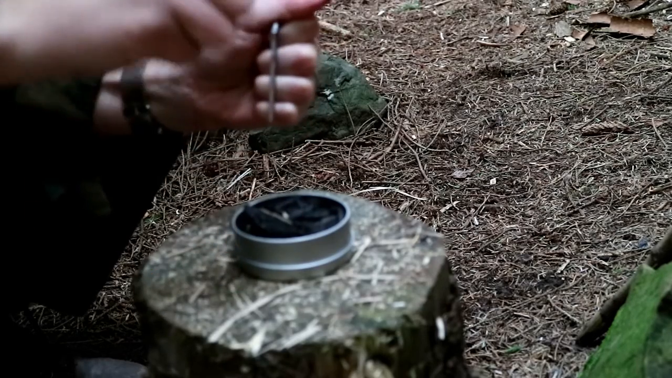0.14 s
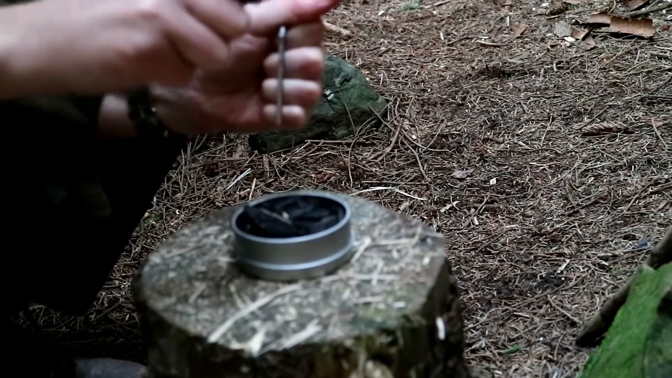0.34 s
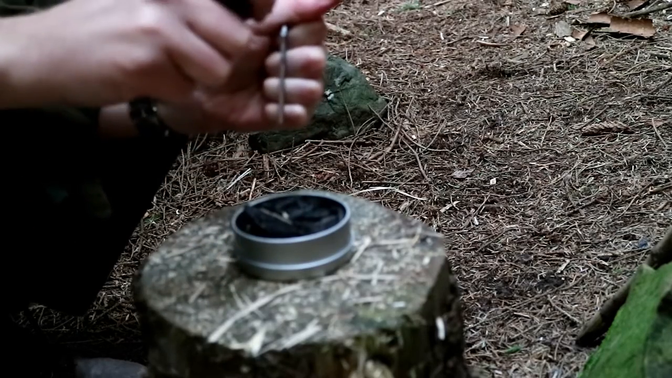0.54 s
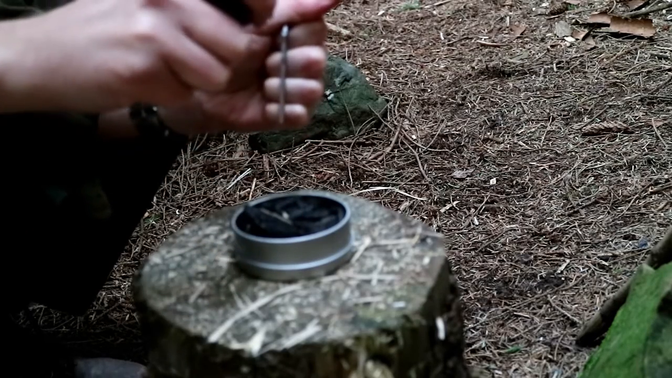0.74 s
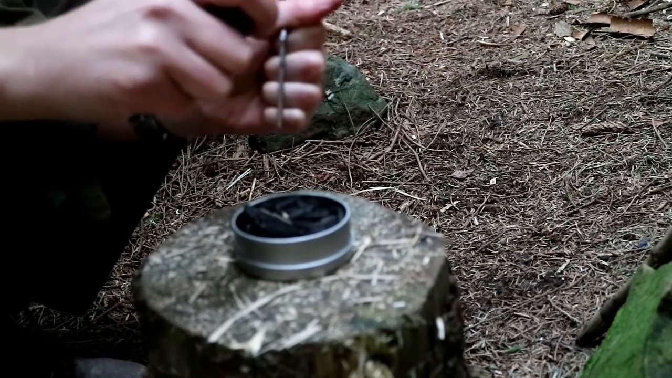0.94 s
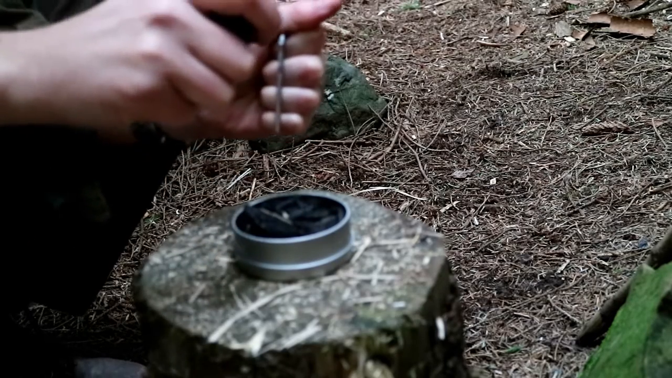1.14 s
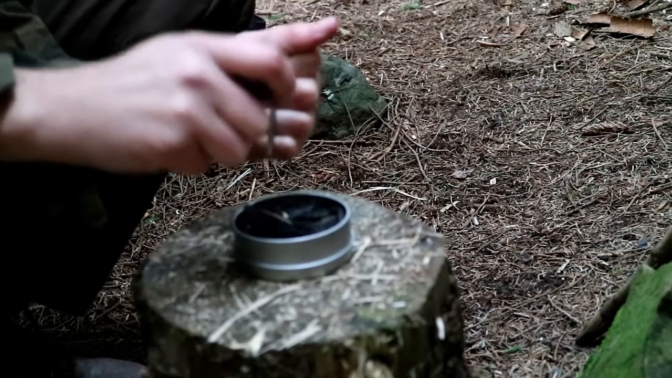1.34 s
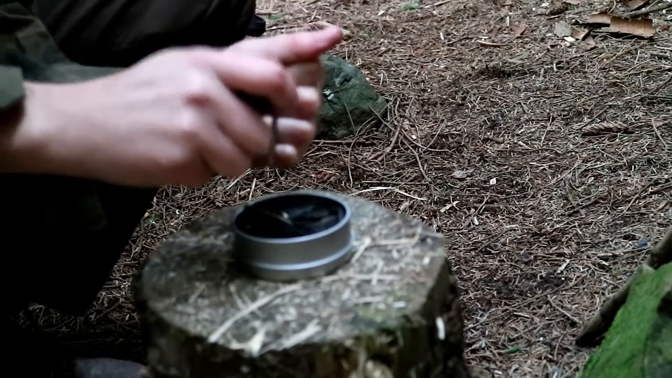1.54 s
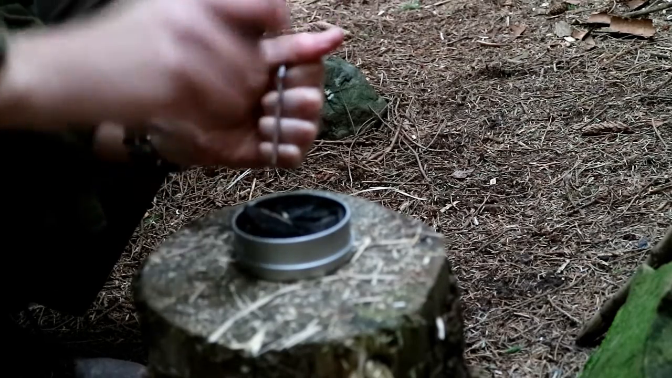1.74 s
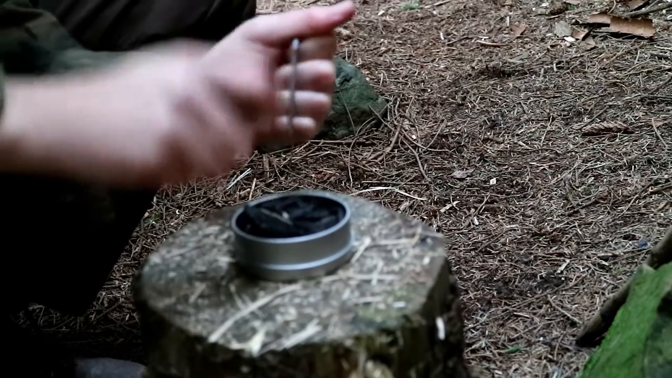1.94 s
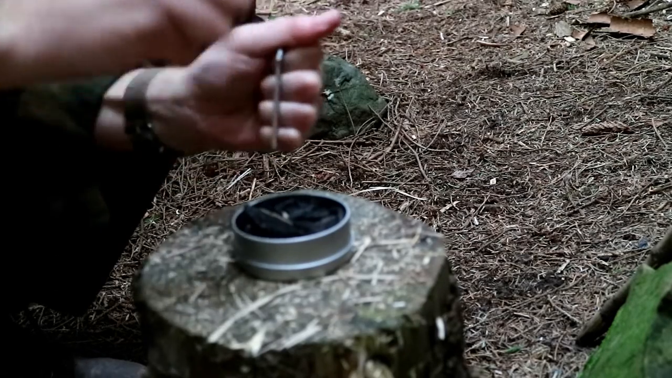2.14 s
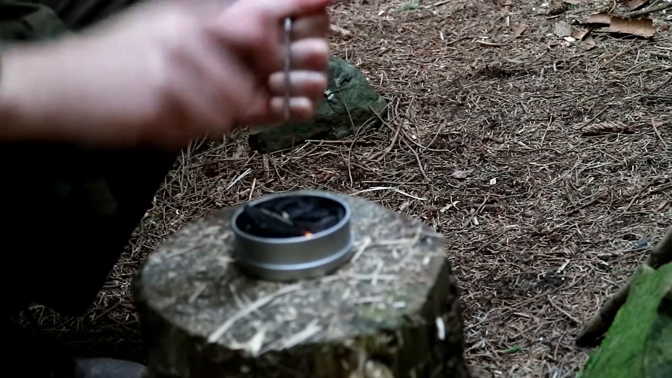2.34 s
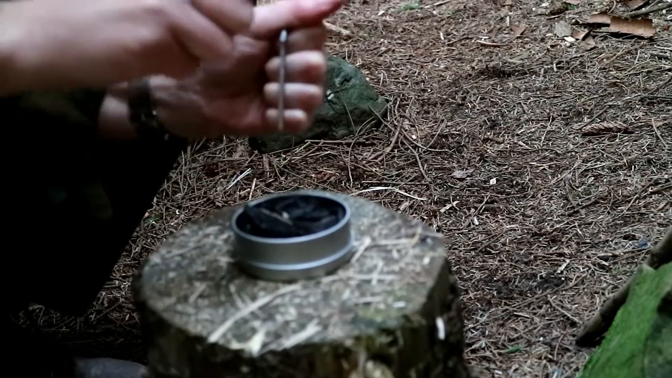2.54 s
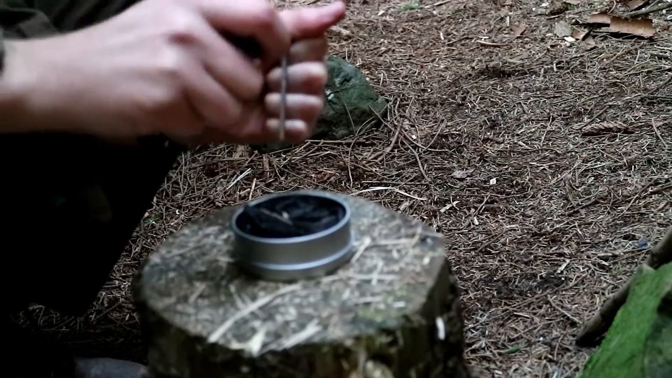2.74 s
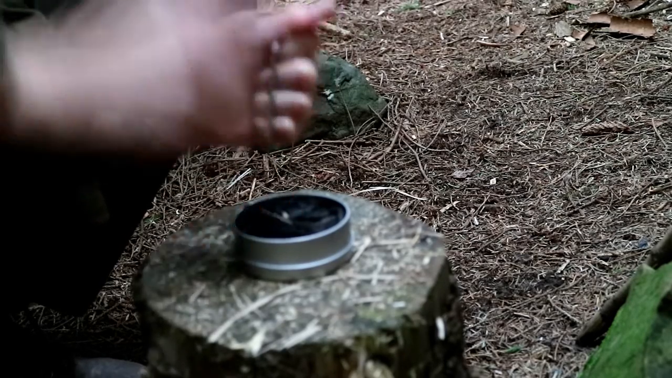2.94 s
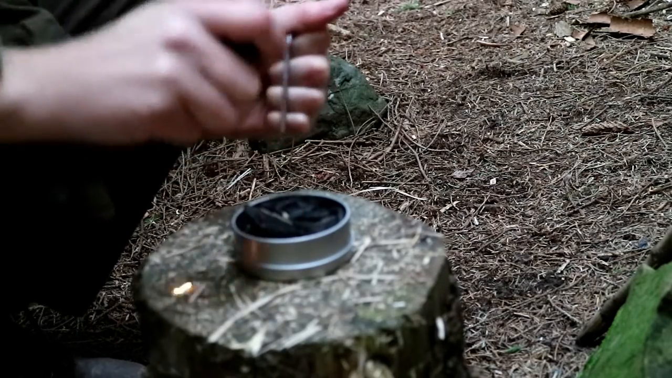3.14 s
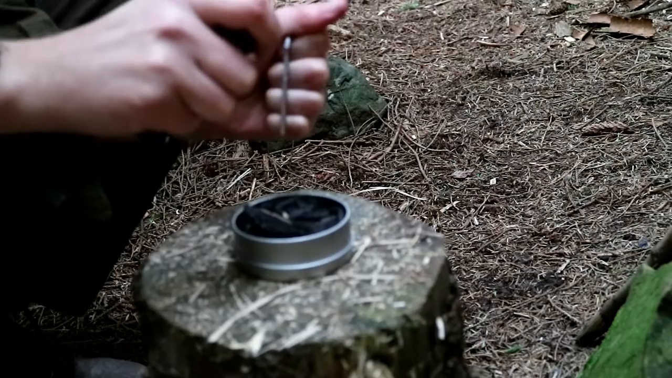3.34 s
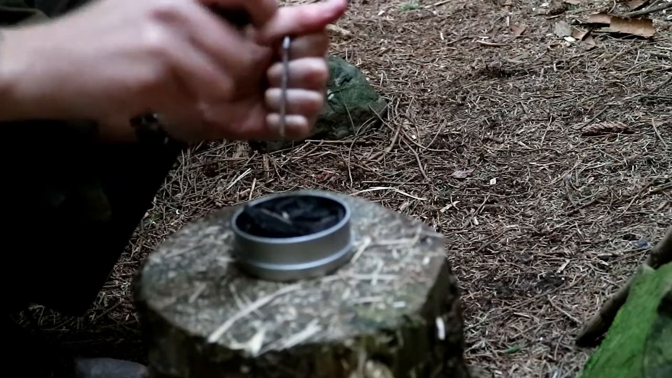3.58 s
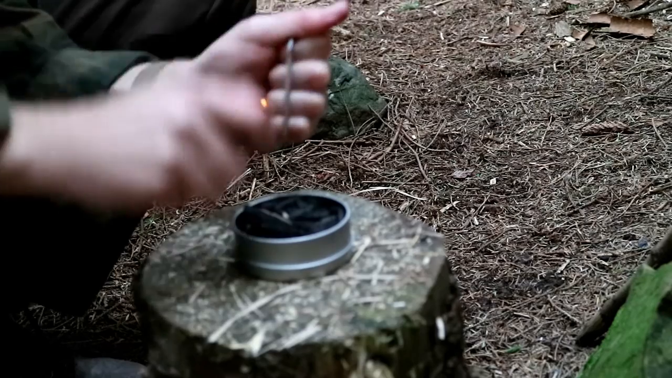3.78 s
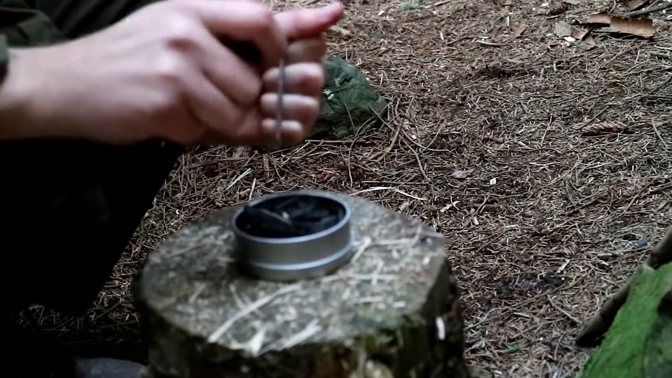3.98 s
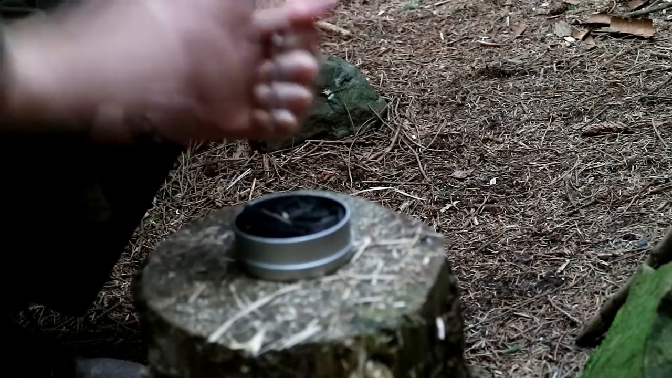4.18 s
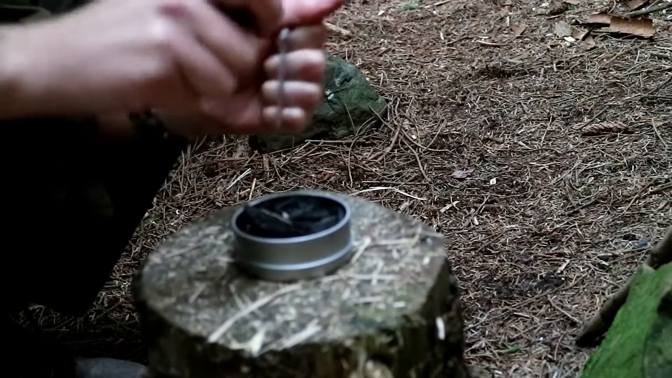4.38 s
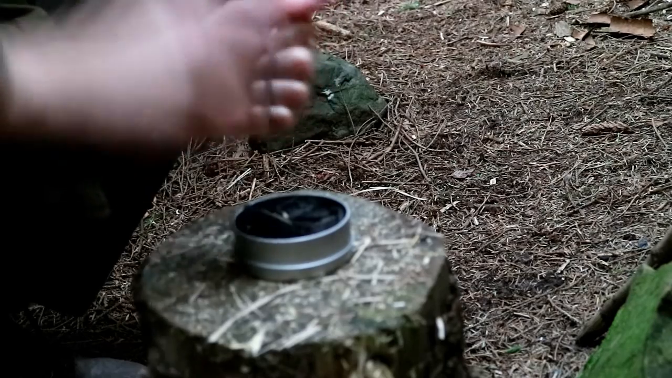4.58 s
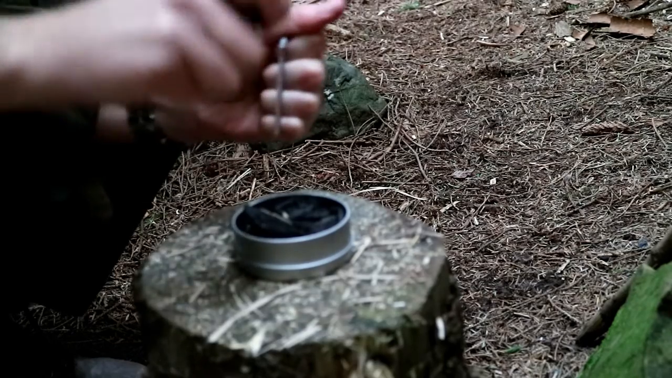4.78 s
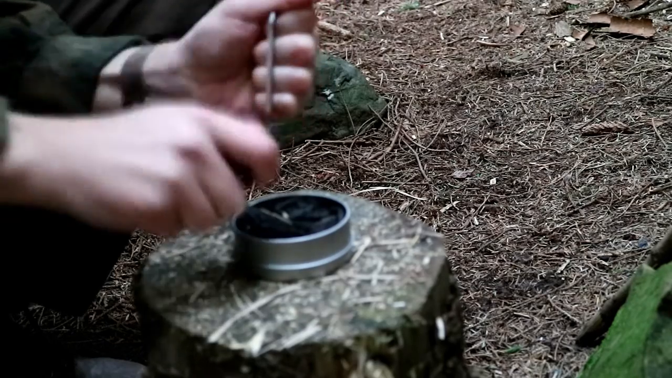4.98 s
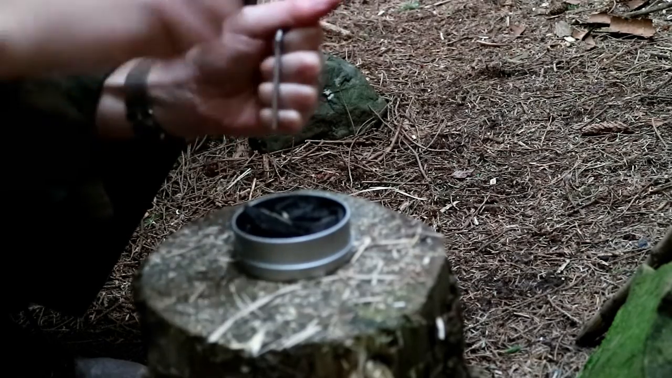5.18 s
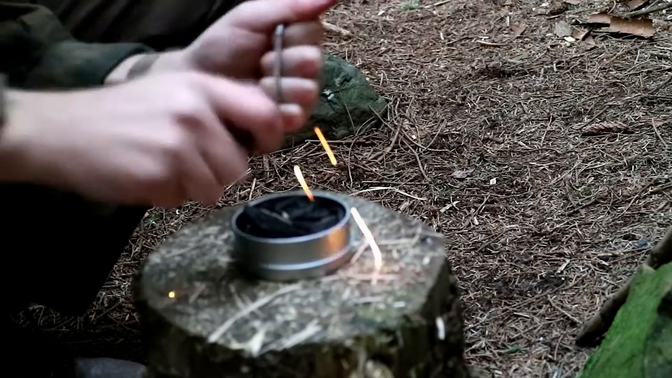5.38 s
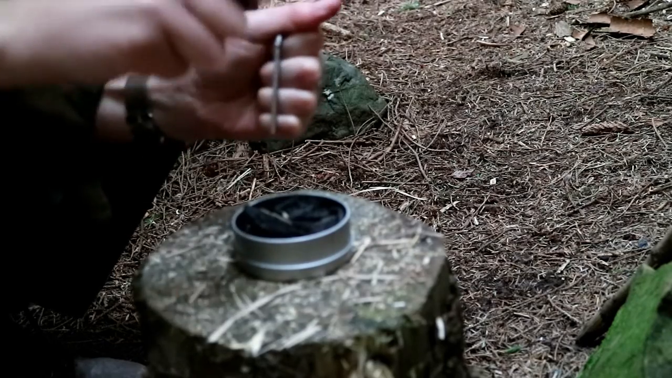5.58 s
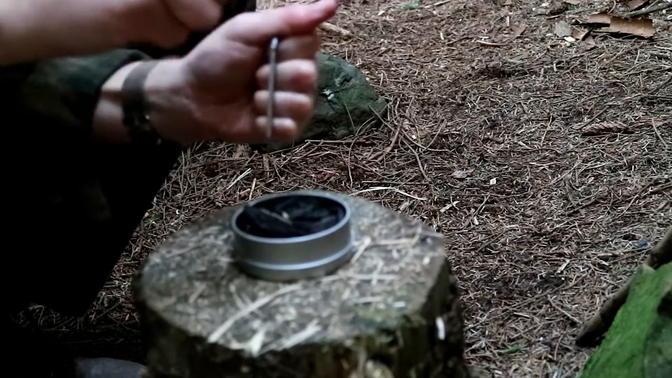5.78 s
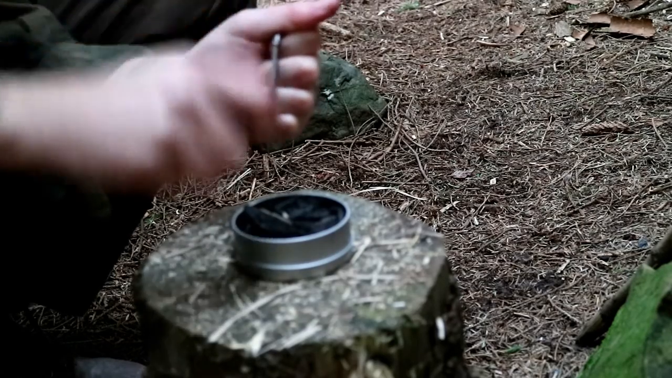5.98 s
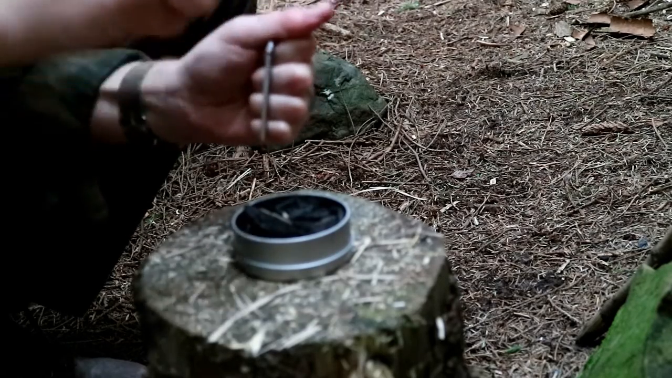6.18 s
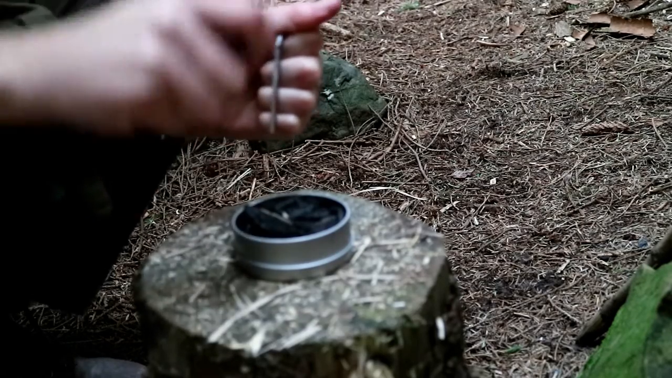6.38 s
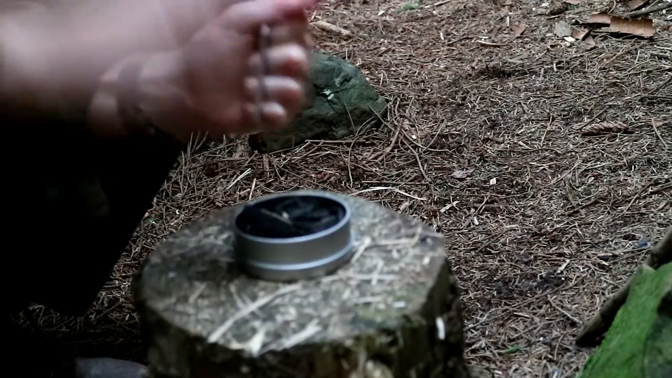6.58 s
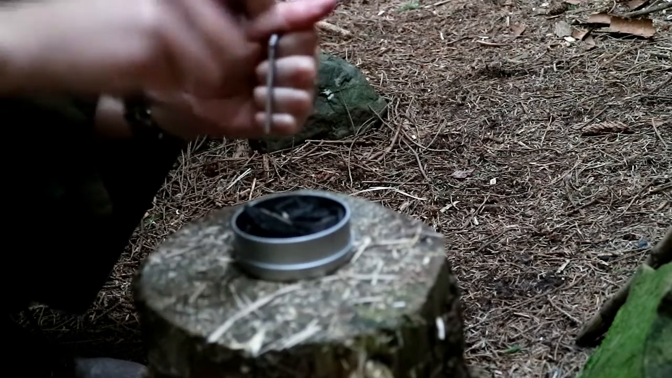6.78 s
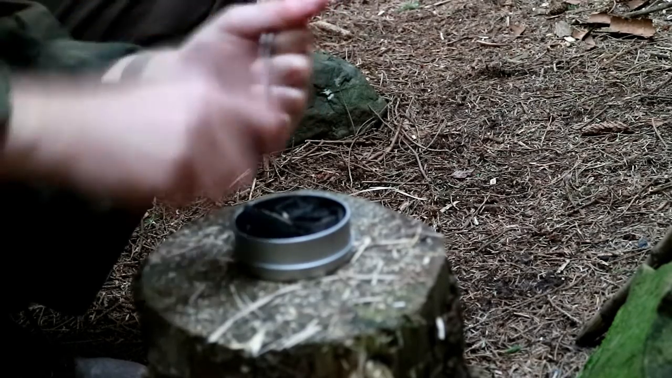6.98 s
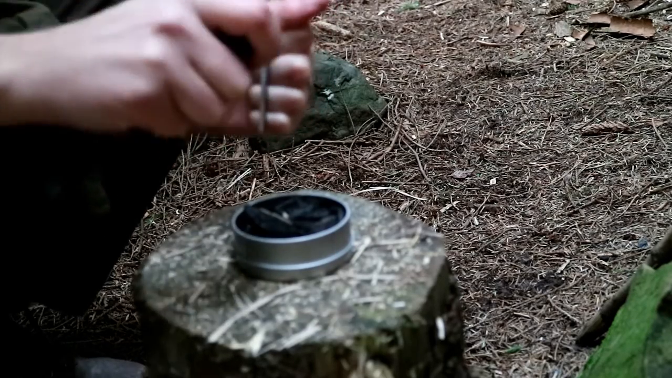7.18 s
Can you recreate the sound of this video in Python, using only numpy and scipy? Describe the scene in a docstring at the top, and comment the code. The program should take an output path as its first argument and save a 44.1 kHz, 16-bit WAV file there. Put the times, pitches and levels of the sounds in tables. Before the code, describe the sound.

Hard dry clicks of stone hitting hand-held steel, rebounding and scraping, at first sparse then about three per second, over faint woodland air.

```python
"""Quiet wood: distant air, a soft rush and thin hiss of coloured noise, swells and sinks throughout.
From 0.09 s flint and steel are struck 14 times close by: crack and ringing modes, rebound, gritty scrape.
Sparse echoes return from the trees; chips and shifting stone tick as a noise snap over a hollow knock.
From 4.9 s a small far bird twitters five calls of swept sines. The loudest blows overload the input."""
import sys
import numpy as np
from scipy import signal
from scipy.fft import rfft, irfft
from scipy.io import wavfile
from scipy.ndimage import uniform_filter1d

SR = 44100
rng = np.random.default_rng(int(sys.argv[2]) if len(sys.argv) > 2 else 0)


def bounce(signal):
    """Save signal as a 16-bit WAV file at the path given by the first command-line argument."""
    frames = np.transpose(np.atleast_2d(signal))
    limited = np.clip(frames, -1, 1)
    pcm = np.round(limited * 32767).astype(np.int16)
    wavfile.write(sys.argv[1], SR, pcm)


N = 318402


def amp(db):
    """Decibels to gain."""
    return 10 ** (np.asarray(db) / 20)


def unit(x):
    """Scales to rms 1."""
    return x / np.sqrt(np.mean(x ** 2) + 1e-20)


def clock(count=4096):
    """Time axis in s of one short sound."""
    return np.arange(count) / SR


def read(points, f_hz):
    """Interpolates a table along a logarithmic frequency axis."""
    point_hz, value = np.transpose(points)
    return np.interp(np.log(f_hz + 1), np.log(point_hz + 1), value)


def add(mix, start_s, sound):
    """Mixes a sound in at start_s, cut at the end of the mix."""
    start = max(round(start_s * SR), 0)
    part = mix[..., start:][..., :sound.shape[-1]]
    part += sound[..., :part.shape[-1]]


def colour(x, points, size=4096):
    """Minimum-phase filter with the given spectrum."""
    f_hz = abs(np.fft.fftfreq(size, 1 / SR))
    log_gain = np.log(amp(read(points, f_hz)))
    spectrum = np.exp(np.conj(signal.hilbert(log_gain)))
    taps = np.fft.ifft(spectrum).real[:size // 2]
    return signal.fftconvolve(x, taps)[:len(x)]


def noise(points, count):
    """Coloured noise of rms 1."""
    f_hz = np.fft.rfftfreq(count, 1 / SR)
    white = rfft(rng.standard_normal(count))
    return unit(irfft(white * amp(read(points, f_hz)), count))


def spread(points, width):
    """Short stereo noise: a shared mid plus a side part of opposite sign left and right."""
    mid = noise(points, len(clock()))
    side = width * noise(points, len(clock()))
    return np.array([mid + side, mid - side])


def burst(x, db, span_s=0.0003):
    """Gives a sound the energy of level db held for span_s."""
    return amp(db) * x * np.sqrt(span_s * SR / np.sum(x ** 2))


# swell of the distant air: (t/s, relative level/dB)
AIR_SWELL = [(0.0, -69), (0.32, -73), (0.78, -69), (1.63, -59), (1.93, -59), (2.07, -62), (2.63, -68),
             (3.04, -65), (3.42, -66), (3.86, -63.5), (4.34, -64), (4.91, -69), (6.07, -69), (6.15, -71),
             (6.69, -72), (7.22, -71)]
# spectrum of the distant air: (f/Hz, relative density/dB)
AIR_SPECTRUM = [(15, -48), (25, -24.5), (136, -1.5), (221, -7), (457, 0), (537, -3), (598, 0), (919, -2.5),
                (997, -1.5), (2360, -5.5), (2560, -5), (2770, -8), (3340, -6), (4150, -12), (15500, -16.5)]
# left-right correlation of the air: (f/Hz, correlation/1)
AIR_CORRELATION = [(40, 0.52), (180, 0.16), (550, 0.51), (1650, 0.79), (4000, 0.53), (8000, 0.39),
                   (15000, .3)]


def air(rush_db=1.3, hiss_db=-4.6):
    """Partly correlated stereo noise, split into low rush and high hiss that share one slow swell."""
    f_hz = np.fft.rfftfreq(N, 1 / SR)
    swell = amp(np.interp(clock(count=N), *np.transpose(AIR_SWELL)))
    left, other = rfft(rng.standard_normal((2, N))) * amp(read(AIR_SPECTRUM, f_hz))
    same = np.clip(read(AIR_CORRELATION, f_hz), -1, 1)
    right = same * left + np.sqrt(1 - same ** 2) * other
    both = np.array([left, right])
    high = np.clip(read([(3500, 0), (6500, 0.92)], f_hz), 0, 1)
    rush = unit(irfft(both * (1 - high), N))
    hiss = unit(irfft(both * high, N))
    return swell * (amp(rush_db) * rush + amp(hiss_db) * hiss)


# modes of hand-held stone and steel: (f/Hz, level/dB, t60/s), varied at each contact
RING_MODES = [(1536, -9.5, 0.021), (2240, -14.5, 0.017), (2677, -6, .017), (3120, 0, .012),
              (3320, -2.5, 0.012), (3625, -6.5, 0.0095), (4056, 0.5, 0.013), (4660, -8.5, 0.011),
              (6190, -17.5, .014), (6650, -19, 0.016), (7340, -22, .018), (8400, -23, .018),
              (10350, -25.5, 0.023)]
# crack of a contact: (f/Hz, relative density/dB)
CRACK_SPECTRUM = [(30, -42.5), (250, -34.5), (450, -27), (700, -21), (1100, -14), (1600, -9), (2200, -5),
                  (3200, 1.5), (4300, 1), (5300, -14), (7200, -15), (10000, -24), (16000, -28)]


def contact(ring_db=-4, splinter_db=-20, splinter_s=0.0019):
    """One bite of flint on steel: impulse plus splintering noise, and modes varied with the spot hit."""
    t = clock()
    force = amp(splinter_db) * rng.standard_normal(len(t)) * np.exp(-t / splinter_s)
    force[0] = 1
    ring = np.zeros(len(t))
    for hz, db, t60_s in RING_MODES:
        decay = amp(db + rng.normal(0, 1.5) - 60 * t / t60_s)
        mode = np.sin(2 * np.pi * hz * rng.normal(1, .015) * t)
        ring += decay * mode * rng.choice([-1, 1])
    return unit(colour(force, CRACK_SPECTRUM)) + amp(ring_db) * unit(ring)


def scrape(length_s, grains_per_s=1100, spread_db=4.5, sag_db=5, release_s=.0045):
    """The edge chatters over the steel as random contacts under fading pressure, then leaves it."""
    t = clock()
    grains = rng.choice([-1., 1.], len(t)) * (rng.random(len(t)) < grains_per_s / SR)
    grains *= amp(spread_db * np.minimum(rng.exponential(1, len(t)), 3))
    sag = amp(-sag_db * np.minimum(t / length_s, 1))
    release = np.exp(-np.maximum(t - length_s, 0) / release_s)
    return signal.fftconvolve(grains * sag * release, contact())[:len(t)]


# strikes: (t/s, blow level/dB, rebound level/dB, scrape level/dB, scrape length/s, catch delay/s,
#           thud relative level/dB, 1.5 kHz knock gain/dB, 7 kHz brightness gain/dB, ring centre f/Hz)
STRIKE_ROWS = [(0.0889, 1, -11, -29, .012, 0.0053, -49, 4, -4, 3180),
               (1.7112, -8, -22, -40.5, .006, .003, -67, 6, -6, 3750),
               (2.0086, 7, 5.5, -21.5, 0.025, 0.015, -47, -1, 7, 4030),
               (2.3864, 6.5, -3, -25, .013, .006, -58, -2.5, 4, 3420),
               (3.1226, 0, -9, -20.5, .016, 0.0067, -59, 9, 3, 3270),
               (3.857, 6.5, -10.5, -27, .027, .0125, -41, 6, 4, 3460),
               (4.3676, 4, -11, -26.5, 0.022, 0.011, -50, 2, 7, 3290),
               (4.7623, 5.5, -4, -30.5, .024, 0.011, -39.5, 9, 0, 3660),
               (5.096, -2.5, -2, -24, 0.018, 0.01, -65, -6, -11, 3300),
               (5.4957, -3, -2.5, -23, .023, .0135, -59, 11, 3, 3050),
               (6.0615, 7, -2, -28, 0.018, .0125, -37.5, -7, 1, 3340),
               (6.405, 4, -7, -33.5, 0.022, 0.0044, -49, 2, -1.5, 3500),
               (6.7696, -3, -18, -30, 0.015, .011, -67, 13, -4, 3620),
               (7.1238, 4, 1, -27.5, .025, 0.017, -51, -1, 6, 3700)]
# dull push of the blow into the hands: (f/Hz, relative density/dB)
THUD_SPECTRUM = [(25, -3.5), (70, -3), (140, 0.5), (260, -8), (420, -3), (700, -2.5), (1500, -22.5),
                 (5000, -59.5)]
# soft fizz trailing each blow: (f/Hz, relative density/dB)
FIZZ_SPECTRUM = [(30, -19.5), (250, -8), (500, -2.5), (900, -1), (2000, 5.5), (4000, 8.5), (5500, 1),
                 (7500, 3), (11000, 0.5), (16000, -5)]
REBOUND_S = .0022  # the stone bounces once and bites again, then slides
CATCH_OVER_SCRAPE_DB = 11
FIZZ_DB, FIZZ_DB_PER_BLOW_DB = -37.5, .6  # harder blows fizz more
GRAZE_S, GRAZE_DB = 1.7065, -13  # the stone grazes the steel just before the lightest blow
RUB_S, RUB_LENGTH_S, RUB_DB = 1.753, .017, -45  # and rubs it faintly on the way back


def strikes(thud_gain_db=7, thud_s=0.0078, thud_width=.3, fizz_s=.023, fizz_width=.6, ring_db=3.5):
    """Each stroke is a blow with thud and fizz, a rebound, and a scrape on which the edge catches once."""
    out, t = np.zeros((2, N)), clock()
    fizz_fade = 1 / np.sqrt(1 + (t / fizz_s) ** 8)
    thud_fade = np.exp(-t / thud_s)
    for (s, blow_db, rebound_db, scrape_db, length_s, catch_s,
         thud_db, knock_db, bright_db, ring_hz) in STRIKE_ROWS:
        # grip and point of contact colour the blow
        grip = [(500, 0), (1500, knock_db), (2000, 0), (2700, 0), (ring_hz, ring_db), (5000, 0),
                (7000, bright_db)]
        add(out, s, burst(colour(contact(), grip), blow_db))
        add(out, s + REBOUND_S, burst(contact(), rebound_db))
        add(out, s + REBOUND_S, burst(scrape(length_s), scrape_db, length_s))
        add(out, s + catch_s, burst(contact(), scrape_db + CATCH_OVER_SCRAPE_DB))
        thud = spread(THUD_SPECTRUM, thud_width) * thud_fade
        add(out, s, amp(thud_db + thud_gain_db) * thud)
        fizz = spread(FIZZ_SPECTRUM, fizz_width) * fizz_fade
        add(out, s, amp(FIZZ_DB + FIZZ_DB_PER_BLOW_DB * blow_db) * fizz)
    add(out, GRAZE_S, burst(contact(), GRAZE_DB))
    add(out, RUB_S, burst(scrape(RUB_LENGTH_S), RUB_DB, RUB_LENGTH_S))
    return out


# colour of the tree echo: (f/Hz, gain/dB)
ECHO_SPECTRUM = [(50, -8.5), (600, -1.5), (1500, -4), (3200, -8.5), (4300, -7.5), (5200, -2), (7000, -1.5),
                 (15000, -6.5)]


def trees(x, t60_s, delay_s, taps_per_s=2500):
    """Sparse decaying echoes from trunks and ground, partly shared by both sides."""
    t = clock(count=SR)
    taps = rng.choice([-1., 1.], (3, SR)) * (rng.random((3, SR)) < taps_per_s / SR)
    taps *= amp(-60 * t / t60_s) * (t > delay_s)
    sides = taps[:2] + 1.2 * taps[2]
    echoes = []
    for side in sides:
        response = colour(side / np.linalg.norm(side), ECHO_SPECTRUM)
        echoes.append(signal.fftconvolve(x, response)[:N])
    return np.array(echoes)


# clear ticks of falling chips and stone shifting in the hand:
# (t/s, relative level/dB, relative snap level/dB)
CLEAR_TICKS = [(0.226, -61.5, -1.5), (0.479, -54.5, -24), (2.112, -43, -9), (3.474, -46.5, -26),
               (4.245, -45.5, -13), (4.432, -49.5, -20), (5.579, -51.5, -10.5), (5.884, -52, -19)]
# hollow knock of a tick: (f/Hz, level/dB, t60/s), f varied at each tick
KNOCK_MODES = [(570, -8.5, 0.081), (750, -1.5, 0.056), (877, -4, .13), (1250, -8, 0.046),
               (2130, -12.5, .06)]
FALL_S, FALL_SCATTER_S = .109, .005  # a faint chip lands after every strike
# harder blows break off larger chips; levels relative, as in CLEAR_TICKS
CHIP_REL_DB, CHIP_DB_PER_BLOW_DB, CHIP_SNAP_REL_DB = -56, .6, -17


def ticks(gain_db=-5, snap_s=.005, snap_gain_db=9):
    """A tiny noise snap over a short modal knock: clear ticks, and a faint chip after each strike."""
    out, t = np.zeros(N), clock()
    snap_spectrum = [(300, -7), (2000, 2.0), (4200, 2), (5500, -11), (8500, -5.0), (15000, -16)]
    chips = []
    for s, blow_db, *_ in STRIKE_ROWS:
        land_s = s + FALL_S + FALL_SCATTER_S * rng.standard_normal()
        chips.append((land_s, CHIP_REL_DB + CHIP_DB_PER_BLOW_DB * blow_db, CHIP_SNAP_REL_DB))
    for s, db, snap_db in [*CLEAR_TICKS, *chips]:
        knock = np.zeros(len(t))
        for hz, mode_db, t60_s in KNOCK_MODES:
            mode = np.sin(2 * np.pi * hz * rng.normal(1, .025) * t)
            knock += amp(mode_db - 60 * t / t60_s) * mode
        snap = noise(snap_spectrum, len(t)) * np.exp(-t / snap_s)
        add(out, s, amp(db + gain_db) * (knock + amp(snap_db + snap_gain_db) * snap))
    return out


# calls: (t/s, relative level/dB)
CALL_TIMES = [(4.891, -2), (4.972, 1), (5.053, 1), (5.143, -3), (5.229, 0)]
# two rising notes of a call: (delay/s, length/s, start f/Hz, end f/Hz, relative level/dB), f varied
CALL_NOTES = [(0, .019, 6270, 7700, -61), (.017, .023, 3800, 6600, -59)]


def bird(gain_db=-6, waver=.02, pitch_scatter=.03):
    """Each call is two quick rising whistles, high then low, with scattered pitch and a random waver."""
    out = np.zeros(N)
    for s, call_db in CALL_TIMES:
        for delay_s, length_s, start_hz, end_hz, note_db in CALL_NOTES:
            hz = np.linspace(start_hz, end_hz, round(length_s * SR)) * rng.normal(1, pitch_scatter)
            hz *= 1 + waver * unit(uniform_filter1d(rng.standard_normal(len(hz)), size=60))
            whistle = np.sin(2 * np.pi * np.cumsum(hz) / SR)
            whistle *= signal.windows.tukey(len(hz), .7)
            add(out, s + delay_s, amp(call_db + note_db + gain_db) * whistle)
    return out


def scene(echo_db=-34, bird_echo_db=5, left_db=-2.1):
    """The hands work slightly right of centre; the bird is far off among the trees."""
    near = strikes() + ticks()
    song = bird()
    near = near + amp(echo_db) * trees(near.mean(0), t60_s=0.48, delay_s=0.019)
    far = song + amp(bird_echo_db) * trees(song, t60_s=.45, delay_s=0.0033) + air()
    return near * amp([[left_db], [0]]) + far


def record(dry, ceiling=.88, edge_hz=16000):
    """Input overload bends peaks smoothly towards the ceiling; a low-pass then limits the band."""
    clipped = dry / (1 + (dry / ceiling) ** 8) ** (1 / 8)
    low_pass = signal.firwin(255, edge_hz, window=("kaiser", 8), fs=SR)
    return signal.oaconvolve(clipped, low_pass[None], "same")


dry = scene()
out = record(dry)
bounce(out)
```